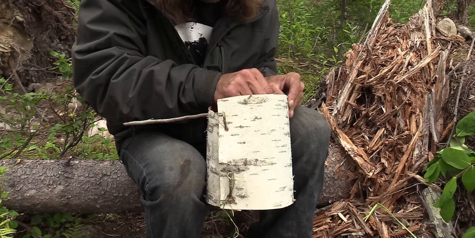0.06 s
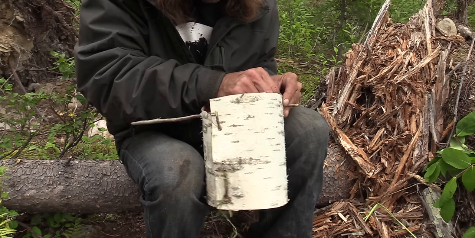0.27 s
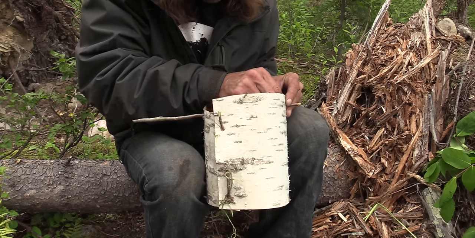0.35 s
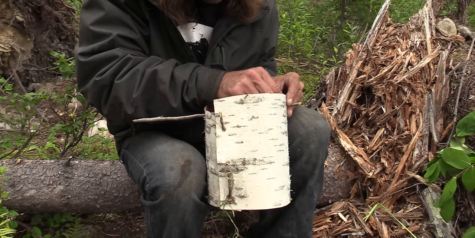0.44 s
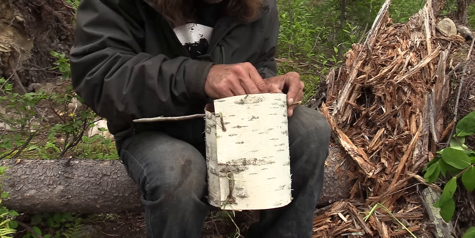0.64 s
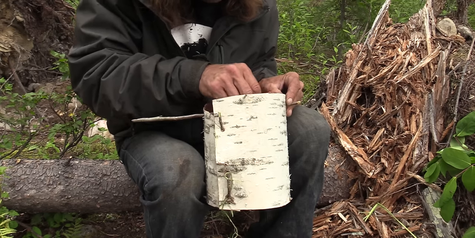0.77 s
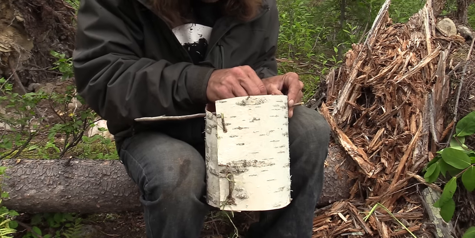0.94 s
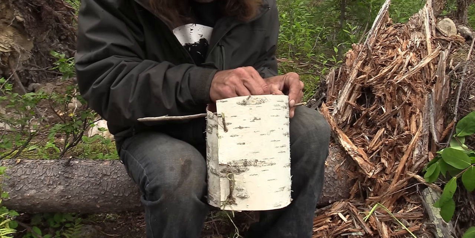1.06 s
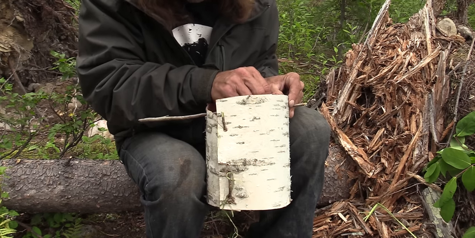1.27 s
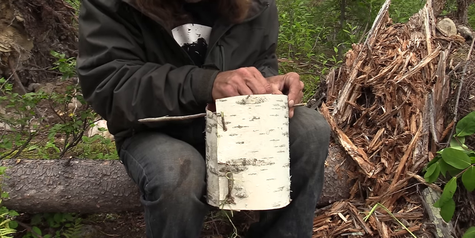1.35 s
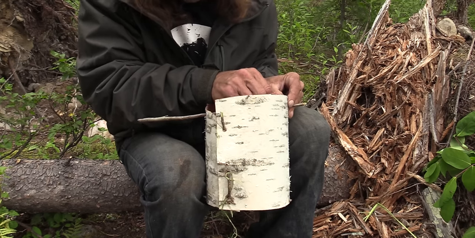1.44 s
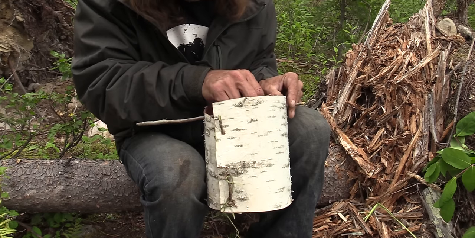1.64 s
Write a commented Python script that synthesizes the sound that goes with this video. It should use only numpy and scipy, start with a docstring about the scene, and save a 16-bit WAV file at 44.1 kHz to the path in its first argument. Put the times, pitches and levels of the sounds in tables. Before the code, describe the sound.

Dry snaps and crackles of birch bark as a stick scrapes through it, close up.

```python
"""Sharp, dry snaps and a soft rasp: a stick pushed through slits in folded birch bark, close up, outdoors.
The bark crumples under the fingers. The stick catches and snaps free; each snap rattles stick and bark
for a few milliseconds and rings the hollow fold. Fibres tick as they break; the freed stick knocks the wall.
Between snaps it slides with a grainy rasp and sings thinly, over faint forest air."""
import sys
import numpy as np
from scipy import signal
from scipy.fft import rfft, irfft
from scipy.io import wavfile

SR = 44100
rng = np.random.default_rng(int(sys.argv[2]) if len(sys.argv) > 2 else 0)


def inscribe(sig):
    """Save sig as 16-bit PCM at rate SR to the path in sys.argv[1].

    A 1-D sig is mono; a 2-D sig holds one channel per row.
    Samples are clipped to [-1, 1] before scaling.
    """
    pcm = np.round(np.clip(np.atleast_2d(sig).T, -1, 1) * 32767)
    wavfile.write(sys.argv[1], SR, pcm.astype(np.int16))


N = 74970
AGE_S = np.arange(6000) / SR  # time axis of one short event

# modes of the hollow fold: pitch_ratio, gain_db, t60_s
FOLD_MODES = [(.68, -9.5, 0.031), (1, 1.5, 0.044), (1.15, -6.5, 0.04)]
FOLD_RISE_S = 0.0026


def undb(db):
    """Decibels to gain."""
    return 10 ** (np.asarray(db) / 20)


def unit(x):
    """Scale to rms 1."""
    return x / np.sqrt(np.mean(x ** 2))


def burst(x, level_db, window_s=0.008):
    """Scale x to the energy of window_s at level_db."""
    return x * undb(level_db) * np.sqrt(window_s * SR / np.sum(x ** 2))


def colour(x, spectrum, size=4096):
    """Minimum-phase filter through points of freq_hz, gain_db."""
    freq_hz, gain_db = np.array(spectrum, float).T
    bins_hz = np.maximum(np.fft.rfftfreq(size, 1 / SR), 1)
    gain = undb(np.interp(np.log(bins_hz), np.log(freq_hz), gain_db))
    cepstrum = irfft(np.log(gain))
    cepstrum[1:size // 2] *= 2
    cepstrum[size // 2 + 1:] = 0
    impulse = irfft(np.exp(rfft(cepstrum)))
    return signal.fftconvolve(x, impulse)[:len(x)]


def add(out, start_s, x):
    """Mix x in at start_s."""
    i = max(int(start_s * SR), 0)
    out[i:i + len(x)] += x[:max(N - i, 0)]


def resonance(centre_hz, width_hz):
    """Noise in one narrow resonance, rms 1."""
    bins_hz = np.fft.rfftfreq(N, 1 / SR)
    rolloff = 1 + (2 * (bins_hz - centre_hz) / width_hz) ** 2
    return unit(irfft(rfft(rng.standard_normal(N)) / rolloff, N))


def envelope(strokes, edge_s=0.005):
    """Gain of a series of soft-edged strokes."""
    t = np.arange(N) / SR
    gain = np.zeros(N)
    for start_s, end_s, start_db, end_db in strokes:
        gate = (np.tanh((t - start_s) / edge_s) - np.tanh((t - end_s) / edge_s)) / 2
        gain += gate * undb(np.interp(t, [start_s, end_s], [start_db, end_db]))
    return gain


def friction(strokes, spectrum, slips_per_s, scatter_db):
    """Tiny slips of uneven size excite the bark during each stroke."""
    size_db = scatter_db * np.minimum(rng.exponential(size=N), 5)
    slipping = rng.random(N) < slips_per_s / SR
    slips = slipping * rng.choice([-1, 1], N) * undb(size_db)
    return envelope(strokes) * unit(colour(slips, spectrum))


def ring(modes, rise_s, pitch=1, detune=0.01):
    """Damped modes, frequencies times pitch; they swell briefly, detuned at random per strike."""
    out = 0
    for freq, gain_db, t60_s in modes:
        freq_hz = freq * pitch * (1 + detune * rng.standard_normal())
        tone = np.sin(2 * np.pi * (freq_hz * AGE_S + rng.random()))
        out += undb(gain_db) * tone * np.exp(-np.log(1000) * AGE_S / t60_s)
    return out * (1 - np.exp(-(AGE_S / rise_s) ** 2))


def forest():
    """Faint outdoor air with a low, wavering hum."""
    # outdoor air: freq_hz, gain_db
    air_spectrum = [(15, -76), (25, -9), (200, -11.5), (354, -14), (560, -12), (754, -18.5), (4030, -22),
                    (4610, -26.5), (13200, -31), (16000, -31)]
    air = undb(-59) * unit(colour(rng.standard_normal(N), air_spectrum))
    hum = undb(-66) * resonance(centre_hz=64.6, width_hz=12)
    return air + hum


def crumple():
    """Bark crumples under the fingers."""
    # finger presses: start_s, end_s, start_db, end_db
    presses = [(0.0, 0.03, -53.5, -56), (0.2, 0.243, -48.5, -46), (0.273, 0.294, -22, -28),
               (0.294, 0.328, -38.5, -34.5), (0.335, 0.356, -32.5, -33), (0.356, 0.43, -53.5, -56),
               (1.35, 1.386, -48, -42.5), (1.49, 1.53, -42, -49.5)]
    # crumpling bark: freq_hz, gain_db
    bark_spectrum = [(24, -43), (45, -7.5), (330, -2), (516, 4.5), (831, -9.5), (1850, -5.5), (2770, -9.5),
                     (16000, -47)]
    return friction(presses, bark_spectrum, slips_per_s=1500, scatter_db=1)


def rattle(spectrum, hold_s, fall_s=0.0017, tail_db=-21.5, tail_fall_s=0.016):
    """Dense contact chatter: short hold, quick fall, faint scatter from the surroundings."""
    contact = np.exp(-np.maximum(AGE_S - hold_s, 0) / fall_s)
    tail = undb(tail_db) * np.exp(-AGE_S / tail_fall_s)
    return colour((contact + tail) * rng.standard_normal(len(AGE_S)), spectrum)


def snaps():
    """The stick slips free: the contact rattles; stick and hollow fold ring."""
    # snaps, levels before layer offsets: start_s, crack_db, fold_db, slap_db, splinter_db, stick_ring_hz
    releases = [(0.0421, -43.5, -64, -66, -51.5, 2700), (.1615, -51, -51, -53, -49, 1100),
                (0.1947, -45, -40, -42, -55, 840), (.2132, -46, -49, -52, -44.5, 1950),
                (0.2308, -38, -67, -57, -43, 2550), (0.2432, -22, -33, -29.5, -26, 1560),
                (.2537, -11, -24.5, -22, -20.5, 2550), (.2688, -8.5, -24, -18, -20.5, 3847),
                (0.2793, -16, -25.5, -28.5, -37, 3030), (0.3167, -29, -47, -36, -60, 1960),
                (0.3309, -18.5, -37, -36, -42, 2620), (.3458, -24, -39, -35.5, -45, 2560),
                (0.4482, -51, -48, -48.5, -79, 1140), (0.4697, -42, -43.5, -48, -78, 890),
                (0.8901, -38, -50, -64, -64, 1730), (0.9, -30, -43.5, -50, -52, 2320),
                (.9116, -25, -34, -39.5, -40, 1750), (.9155, -15, -30.5, -28.5, -35.5, 2523),
                (0.9588, -12.5, -24, -24.5, -27.5, 2520), (1.0257, -42.5, -44.5, -41, -62, 1055),
                (1.0775, -12, -21.5, -24.5, -27.5, 2040), (1.1327, -20, -33, -40, -37.5, 1940),
                (1.1399, -15.5, -28.5, -33, -39, 2560), (1.15, -11.5, -23, -33.5, -33, 2880),
                (1.2569, -10.5, -26, -30, -29, 2020), (1.2821, -35, -49.5, -46, -67, 1700),
                (1.3135, -36, -51, -48, -66, 1790), (1.3319, -32.5, -43.5, -44, -76, 1730),
                (1.353, -37, -44.5, -41.5, -52.5, 1110), (1.419, -35.5, -45.5, -47, -73, 1770),
                (1.457, -45, -52, -59, -70, 970), (1.482, -29, -49.5, -45.5, -49, 1850),
                (1.514, -33.5, -52, -45, -50.5, 2550), (1.5525, -39.5, -41, -52, -71, 2496),
                (1.6246, -28, -44.5, -42.5, -43, 4006), (1.672, -36, -68, -78, -50.5, 3230)]
    # fold tuned by the grip: time_s, pitch_hz
    fold_tuning = [(0.254, 577), (0.27, 507), (.915, 560), (0.96, 525), (1.08, 524), (1.15, 546),
                   (1.26, 511), (1.42, 572)]
    # modes of the stick held in the bark: freq_hz, gain_db, t60_s
    stick_modes = [(1170, -12.5, 0.01), (1755, 1.5, 0.023), (1953, 0.5, 0.027), (2437, 3, 0.031),
                   (2641, 3, 0.02), (3140, -5.5, 0.011), (4230, -7, 0.022)]
    # contact crack, bark slap, bright splinter: freq_hz, gain_db
    crack_spectrum = [(700, -61), (1400, -9.5), (1750, 1), (2230, -7), (2500, -3), (3350, 0.5), (3650, -8),
                      (3900, -8), (5200, -13), (7000, -31.5), (16000, -52.5)]
    slap_spectrum = [(40, -32), (120, -17), (300, -4), (450, -22), (750, -1.5), (1100, 2), (1450, -5),
                     (2000, -8), (4000, -68)]
    splinter_spectrum = [(2000, -30), (3900, 4), (5300, -1), (7000, -5.5), (8000, -5.5), (10500, -16.5),
                         (14000, -14), (17000, -31)]
    out = np.zeros(N)
    for start_s, crack_db, fold_db, slap_db, splinter_db, stick_ring_hz in releases:
        fold_hz = np.interp(start_s, *np.array(fold_tuning).T)
        hold_s = np.interp(crack_db, [-31.5, -12], [0.0018, 0.0044])  # harder snaps chatter longer
        crack = burst(rattle(crack_spectrum, hold_s), crack_db - 14)
        slap = burst(rattle(slap_spectrum, hold_s), slap_db - 3)
        splinter = burst(rattle(splinter_spectrum, hold_s=0.0012, fall_s=0.0032), splinter_db - 4)
        stick = burst(ring(stick_modes, rise_s=0.00023), crack_db - 15)
        # the stick's strongest ring in each snap
        stick_ring = burst(ring([(stick_ring_hz, 0, 0.016)], rise_s=0.00034), crack_db - 15.5)
        fold = burst(ring(FOLD_MODES, FOLD_RISE_S, fold_hz), fold_db - 1.5)
        add(out, start_s, crack + slap + splinter + stick + stick_ring + fold)
    return out


def fibre_breaks(fall_s=0.00007):
    """Fibres part with a hard, bright tick as the tip goes through."""
    # breaking fibres: start_s, level_db, pitch_hz
    ticks = [(.2688, -24, 5000), (1.1516, -38.5, 12000), (1.257, -43, 9000)]
    out = np.zeros(N)
    for start_s, level_db, pitch_hz in ticks:
        tick = np.exp(-AGE_S / fall_s) * np.cos(2 * np.pi * pitch_hz * AGE_S)
        add(out, start_s, burst(tick, level_db))
    return out


def knocks(thump_s=0.2735, thump_db=-23.5, thump_hz=596):
    """The freed stick knocks the bark wall; after the first breakthrough it thumps the whole fold."""
    # hits on the wall: start_s, level_db
    hits = [(.275, -32.5), (1.151, -36), (1.2558, -37), (1.483, -44.5)]
    # modes of the bark wall: freq_hz, gain_db, t60_s
    wall_modes = [(246, -6.5, 0.021), (335, -7, 0.033)]
    out = np.zeros(N)
    for start_s, level_db in hits:
        add(out, start_s, burst(ring(wall_modes, rise_s=0.0023), level_db))
    add(out, thump_s, burst(ring(FOLD_MODES, FOLD_RISE_S, thump_hz), thump_db))
    return out


def slide():
    """The sliding stick rasps on the bark and at times sings thinly."""
    # rasping and singing strokes: start_s, end_s, start_db, end_db
    rasp_strokes = [(0.475, 0.615, -52.5, -49.5), (0.615, 0.70, -52.5, -49.5), (0.70, 0.782, -45.5, -45),
                    (0.85, 0.91, -51.5, -54), (0.968, 1.003, -40.5, -46.5), (1.28, 1.385, -54, -60),
                    (1.485, 1.53, -72, -47), (1.565, 1.70, -50, -49.5)]
    sing_strokes = [(0.5, 0.62, -56.5, -56.5), (0.62, 0.79, -72, -57)]
    # stick rubbing bark: freq_hz, gain_db
    rasp_spectrum = [(120, -28), (330, -22.5), (473, -4), (749, -8), (821, -14), (1250, -13.5),
                     (1530, -11.5), (2210, -15), (3370, -12), (3760, -24), (4600, -21), (14900, -46.5)]
    rasp = friction(rasp_strokes, rasp_spectrum, slips_per_s=6000, scatter_db=1.5)
    singing = envelope(sing_strokes) * resonance(centre_hz=3370, width_hz=360)
    return rasp + singing


def scene():
    """All sources, centred in stereo."""
    mono = slide() + crumple() + snaps() + fibre_breaks() + knocks() + forest()
    return np.array([mono, mono])


def record(dry, low_cut_hz=62, hiss_db=-74.5, high_cut_hz=16000):
    """Low cut, independent hiss per channel, high cut."""
    highpass = signal.butter(2, low_cut_hz, "high", fs=SR, output="sos")
    lowpass = signal.ellip(8, 0.2, 70, high_cut_hz, fs=SR, output="sos")
    hiss = undb(hiss_db) * rng.standard_normal(dry.shape)
    return signal.sosfilt(lowpass, signal.sosfilt(highpass, dry) + hiss)


dry = scene()
out = record(dry)
inscribe(out)
```